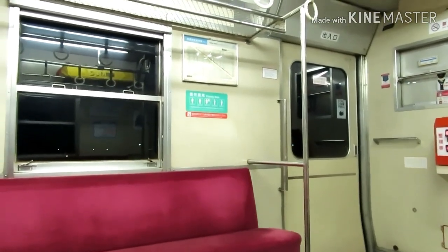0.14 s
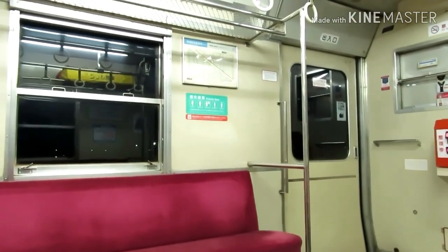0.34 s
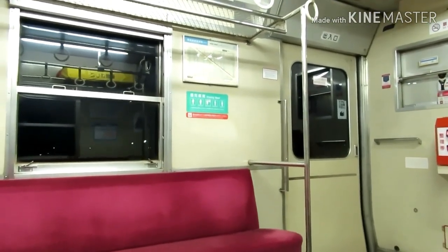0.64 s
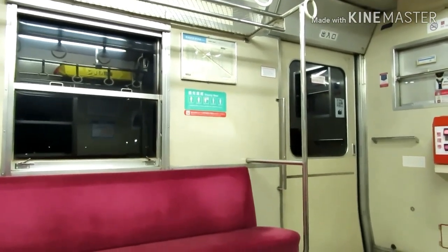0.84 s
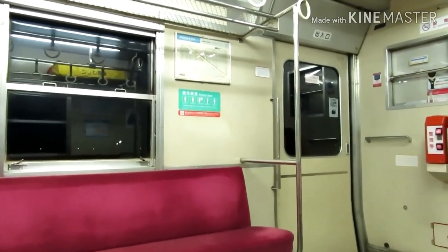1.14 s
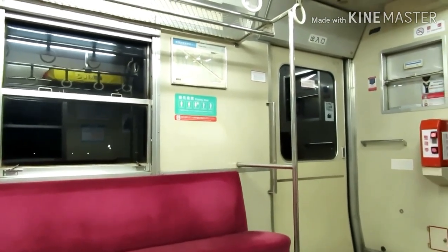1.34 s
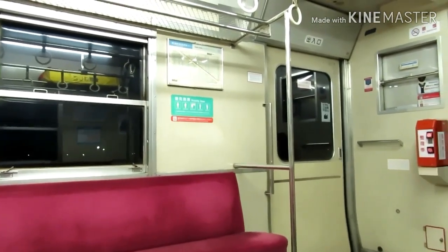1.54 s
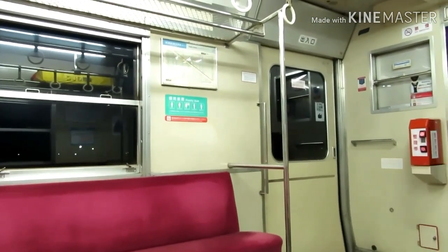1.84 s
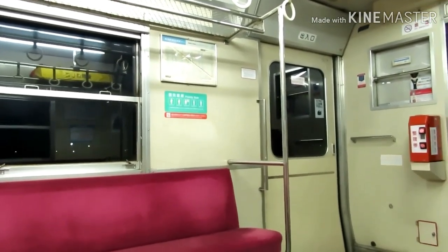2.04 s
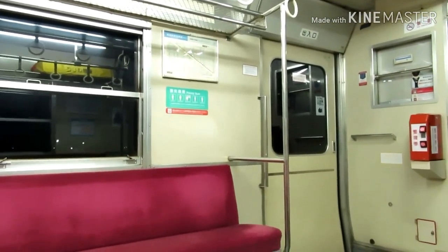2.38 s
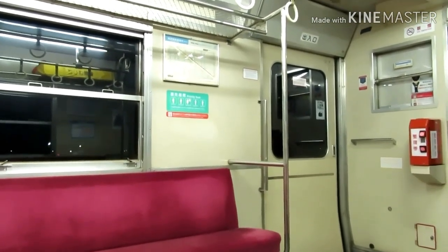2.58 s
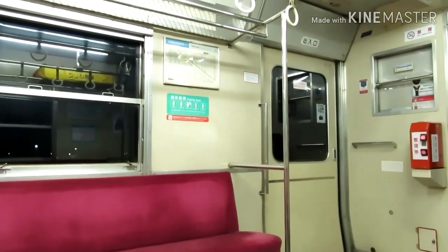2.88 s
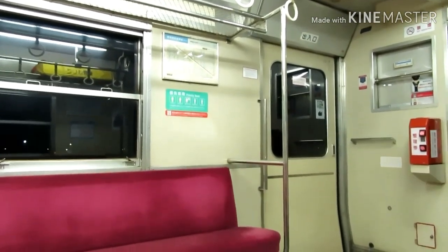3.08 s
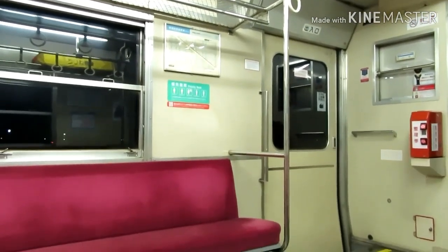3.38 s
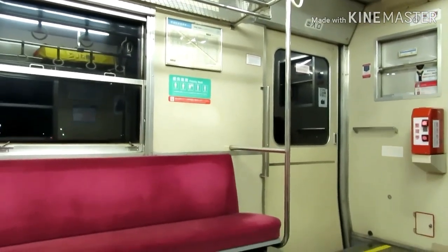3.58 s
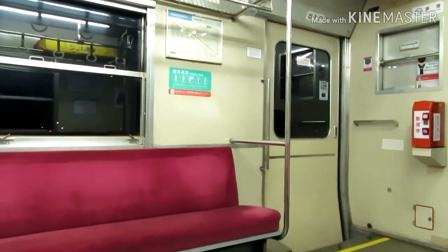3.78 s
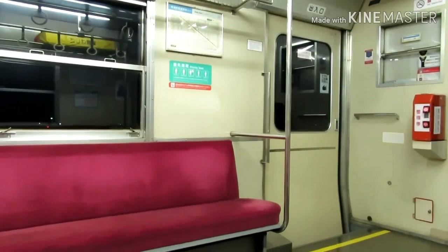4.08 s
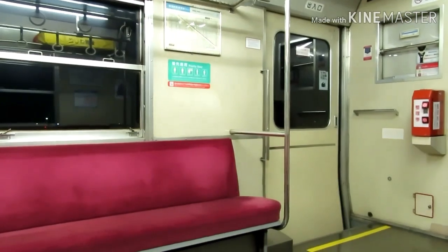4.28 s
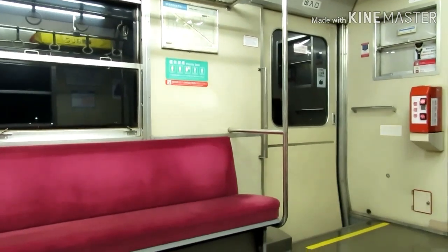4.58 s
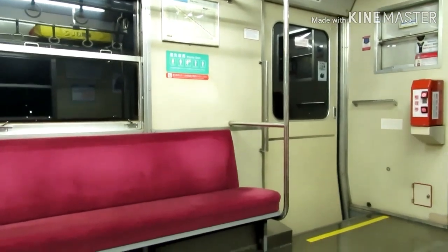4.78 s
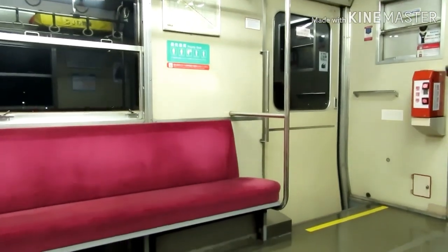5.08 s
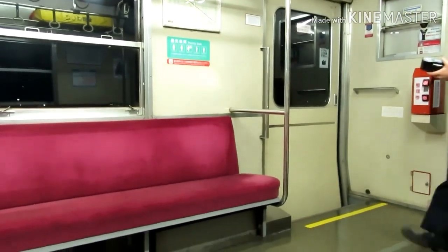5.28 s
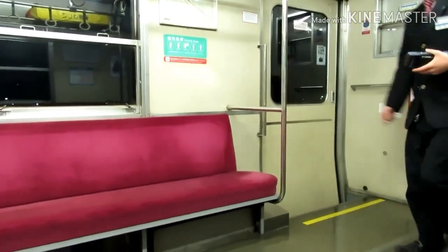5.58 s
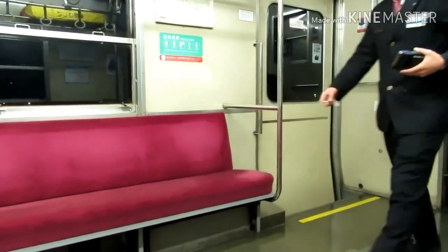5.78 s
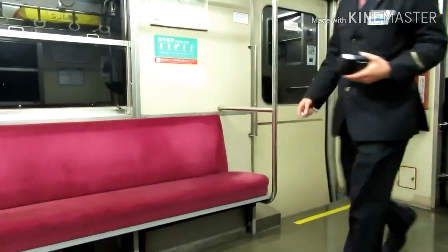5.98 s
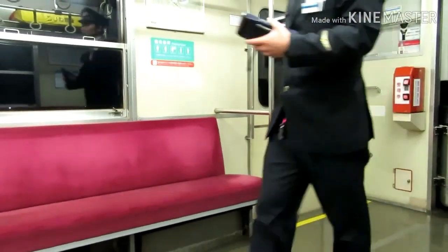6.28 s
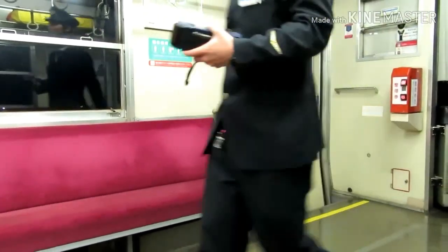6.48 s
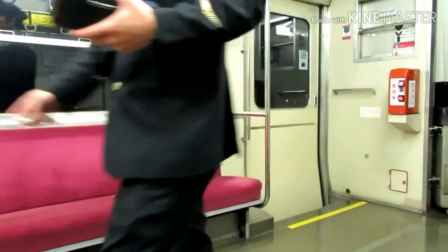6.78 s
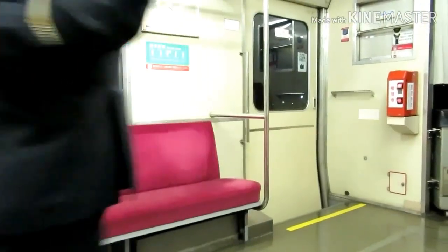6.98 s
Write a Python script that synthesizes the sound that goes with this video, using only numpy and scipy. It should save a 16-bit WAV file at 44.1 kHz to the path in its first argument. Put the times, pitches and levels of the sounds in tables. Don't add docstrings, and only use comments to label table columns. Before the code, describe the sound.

Inside a moving diesel railcar, a steady deep engine drone and slow swelling body boom lie under the broad roar of wheels on rails. Hard joint knocks come early, then heavy dull thuds near the middle with rubber squeaks and short groans. Later knocks are softer, with fittings ticking. A close stereo microphone hears shared bass and slightly wider treble.

```python
import sys
import numpy as np
from scipy import signal
from scipy.io import wavfile
from scipy.ndimage import uniform_filter1d, minimum_filter1d

SR = 44100
rng = np.random.default_rng(int(sys.argv[2]) if len(sys.argv) > 2 else 0)


def to_linear_factor(level_db):
    exponent = np.asarray(level_db, float) / 20
    return 10 ** exponent


def persist_wave(psi):
    counts = np.round(np.clip(psi, -1, 1) * 32767).astype(np.int16)
    wavfile.write(sys.argv[1], SR, np.atleast_2d(counts).T)


N = 314433

# time in seconds, cycles per second.
CRANK_SPEED = [(0, 13.98), (7.13, 14.07)]
# time in seconds, lift of the firing order in dB.
ENGINE_LOAD = [(0, -1.5), (.5, 4), (1.7, -0.5), (2.5, 3), (3.5, -3.5), (4.5, 2.5), (5.8, -.5), (6.5, 6),
               (7.13, 0)]
# order of the crank cycle, level in dB.
WEAK_ORDERS = [(3, -60), (4, -36.5), (11, -34.5), (13, -27), (14, -42), (20, -35.5), (28, -49), (30, -47.5)]
# pitch in Hz, width in Hz, level in dB.
BOOM_MODES = [(61.82, 1.76, 15), (57.2, 4.6, -15), (54.4, 2, -27), (119.5, 2.7, 1.5), (137, 1.8, -11),
              (222, 1.8, -12)]
# centre in seconds, lift in dB, length in seconds.
BODY_SWINGS = [(.4, 4.5, 0.56), (1.03, 8.5, 0.4), (1.65, 10.5, 0.23), (2.35, 9, 0.56), (2.85, -4, .45),
               (3.62, 5, 0.53), (4.2, 7.5, 0.98), (5.3, 6, 0.23), (6.4, 0.5, 1.0), (7.1, 7.5, 0.97)]
TRACK_HZ = [40, 250, 1200, 5000]
ROUGHNESS_SHARES = [.01, .6, 1.01, 1.15]
# time in seconds, level in dB.
RAIL_ROUGHNESS = [(0, -37), (.12, -35), (.4, -35), (.72, -33), (.9, -34.5), (1.12, -33.5), (1.62, -36.5),
                  (1.76, -40.5), (2.4, -35.5), (3.0, -37), (3.25, -40), (3.55, -36.5), (3.75, -38.5),
                  (4.2, -36.5), (5.1, -38), (5.38, -35.5), (5.9, -38), (6.6, -36)]
# centre in seconds, lift in dB, length in seconds.
TRACK_DIPS = [(.75, 6.5, 2.7), (1.1, -3.5, 0.55), (1.5, 2.5, 1.2), (2.9, 10.5, 0.67), (3.56, 7.5, 0.15),
              (4.1, -1, .4), (4.65, 6.5, .75), (5.25, 10, .7), (6.58, 9, 0.74), (7.1, 3.5, 0.65)]
# centre in seconds, lift in dB, length in seconds.
FLOOR_DRUMMING = [(1.4, 0, 0.13), (2.77, 1.5, 0.27), (3.25, 3.5, 1), (5.45, 4, 0.83), (6.0, 4.5, 0.94),
                  (6.9, 1.5, 1)]
# centre in seconds, lift in dB, length in seconds.
CHATTER = [(.52, 1.5, .4), (3.02, 0.5, .2), (5.0, 1.5, .25), (6.6, 3.5, 0.45)]
# frequency in Hz, level in dB per Hz.
SHARED_ROAR = [(9, -40), (22, -16), (32, 1), (70, -1.5), (110, -5), (171, -5.5), (215, -9), (279, -2.5),
               (457, -16), (685, -18), (915, -27.5), (1680, -30.5), (3180, -39), (6500, -54.5),
               (10500, -62), (13500, -67), (15300, -73)]
# frequency in Hz, level in dB per Hz.
APART_ROAR = [(24, -75), (40, -44), (86, -12), (165, -5), (264, -0.5), (480, -7), (631, -11.5), (2080, -14),
              (11500, -29), (13400, -29), (15200, -34)]
# pitch in Hz, width in Hz, lift in dB.
CABIN_MODES = [(308, 44, -1.5), (395, 29, -2), (696, 140, -3), (2450, 60, 1.5), (8300, 740, 3.5)]
# start in seconds, blow in dB, floor ring in Hz, brightness in dB.
RAIL_JOINTS = [
    (0.558, -18, 161.5, -18),
    (1.38, -7.5, 199.4, -17),
    (1.63, -9, 193, -17.5),
    (2.76, -13, 305, -22),
    (3.05, -6, 159, -30),
    (3.483, -6, 159.4, -33),
    (4.969, -13.5, 406, -22),
    (5.35, -15, 189, -19),
    (6.058, -22, 168, -17),
    (6.57, -25, 260, -7),
]
# frequency in Hz, time to fall 60 dB in seconds.
JOINT_T60 = [(100, 0.23), (600, 0.17), (4000, 0.35)]
# pitch in Hz, level in dB, time to fall 60 dB in seconds.
BOGIE_MODES = [(400, -4, 0.15), (694, -11, 0.16), (1200, -11.5, 0.12), (1750, -8.5, 0.038),
               (2067, -15.5, 0.13), (4000, -23.5, 0.1)]
# centre in seconds, pitch in Hz, level in dB, length in seconds.
FLOOR_PANELS = [(0.369, 117.2, -21, 0.22), (.55, 146.5, -23.5, 0.27), (1.928, 309.4, -26, .3),
                (2.271, 395, -31.5, .3), (2.81, 355, -27.5, 0.28), (3.173, 260, -25.5, 0.26),
                (3.2, 137, -20, .3), (3.299, 395, -29.5, .35), (5.12, 174.7, -27.5, 0.22),
                (5.399, 440, -31, .3), (5.688, 392, -27.5, 0.15), (5.6, 133.4, -20, .2),
                (6.121, 282.3, -23.5, 0.47), (6.892, 289.7, -26, 0.29), (7.081, 395, -28, 0.21),
                (7.07, 164.6, -30, .15)]
# start in seconds, length in seconds, level in dB, top pitch in Hz,
# depth of the cluster below it in Hz.
SQUEAKS = [
    (3.161, .5, -55, 10850, 1200),
    (5.45, .12, -55, 10250, 350),
    (5.818, .08, -60, 9950, 250),
    (6.961, 0.051, -49, 7330, 400),
    (7.038, .3, -58, 9700, 900),
]
# start in seconds, length in seconds, level in dB, pitch in Hz.
GROANS = [
    (3.087, 0.19, -33.5, 704),
    (3.273, 0.21, -35, 648),
    (3.45, 0.19, -30.5, 619),
]
# start in seconds, peak in dB, ring in Hz, time to fall 60 dB in seconds.
FITTING_TICKS = [(.67, -41, 8000, 0.025), (.77, -46, 8000, .03), (2.46, -51, 8500, .03),
                 (2.63, -49, 8000, .03), (3.613, -44, 8700, .025), (1.626, -47, 4000, 0.14),
                 (1.656, -41, 3000, 0.072), (4.895, -57, 11900, .15), (4.91, -57, 14500, .15),
                 (4.925, -54, 10500, .1), (4.935, -59, 13000, .1), (5.365, -45.5, 8000, .04),
                 (5.625, -52, 7800, .03), (6.01, -49, 9000, .03), (6.535, -47, 5300, .03),
                 (6.628, -40, 4530, 0.058), (6.629, -41, 11000, .015), (6.63, -49, 7500, .02),
                 (6.768, -45, 12400, .025), (7.037, -51, 13000, .025)]


def evened(x):
    return x / np.sqrt(np.mean(x ** 2) + 1e-20)


def read(points, hz):
    f, value = np.transpose(points)
    return np.interp(np.log(hz + 1), np.log(f + 1), value)


def curve(rows, t):
    s, value = np.transpose(rows)
    return np.interp(t, s, value)


def humps(rows, t):
    total = 0
    for s, db, length in rows:
        total = total + db * np.cos(np.pi * np.clip((t - s) / length, -.5, .5)) ** 2
    return total


def add(mix, s, sound):
    part = mix[..., round(s * SR):][..., :sound.shape[-1]]
    part += sound[..., :part.shape[-1]]


def resonate(x, hz, width):
    turn = np.exp(2j * np.pi * np.cumsum(hz * np.ones(x.shape[-1])) / SR)
    r = np.exp(-np.pi * abs(width) / SR)
    for _ in range(2):
        x = 2 * (turn * signal.lfilter([1 - r], [1, -r], x / turn + 1e-18)).real
    return x


def coloured(db, count):
    re, im = rng.standard_normal((2,) + db.shape[::-1])
    spectra = (re + 1j * im).T * to_linear_factor(db)
    return evened(signal.istft(spectra, nperseg=1024, noverlap=768)[1][:count])


def engine():
    t = np.arange(N) / SR
    load_db = curve(ENGINE_LOAD, t)
    firing_db = -23.5 + load_db
    double_db = -27 + 0.51 * load_db + 0.31 * t
    turn = 2 * np.pi * np.cumsum(curve(CRANK_SPEED, t)) / SR
    out = to_linear_factor(firing_db) * np.sin(6 * turn) + to_linear_factor(double_db) * np.sin(12 * turn + 1)
    for order, db in WEAK_ORDERS:
        waver = evened(uniform_filter1d(rng.standard_normal(N), size=9000))
        out += to_linear_factor(db + 1.03 * waver) * np.sin(round(order) * turn + 2 * np.pi * rng.random())
    return np.sqrt(2) * out


def body():
    shake = rng.standard_normal(N)
    modes = sum(to_linear_factor(db) * evened(resonate(shake, hz, width)) for hz, width, db in BOOM_MODES)
    held = np.sqrt(uniform_filter1d(modes ** 2, size=6000)) + 0.22
    return evened(modes / held) * to_linear_factor(-23 + humps(BODY_SWINGS, np.arange(N) / SR))


def drift(shape, frames, bins):
    smooth = uniform_filter1d(rng.standard_normal(shape), frames, 0)
    return evened(uniform_filter1d(smooth, bins, 1)).T


def track():
    t, hz = np.arange(N // 256 + 5) * 256 / SR, np.fft.rfftfreq(1024, 1 / SR)
    levels = np.outer(ROUGHNESS_SHARES, curve(RAIL_ROUGHNESS, t))
    levels[0] += humps(TRACK_DIPS, t)
    levels[1] += humps(FLOOR_DRUMMING, t)
    levels[3] += humps(CHATTER, t)
    share = np.array([read(list(zip(TRACK_HZ, one)), hz) for one in np.eye(4)])
    field = share.T @ (levels - levels.mean(1, keepdims=True))

    shape = (len(t), len(hz))
    patches = drift(shape, 10, 14)
    cabin_drift = drift(shape, 24, 2)
    rattle = evened(uniform_filter1d(rng.standard_normal(len(t)), size=4))
    field += (1.57 + 2.4 * hz / 15000)[:, None] * cabin_drift
    field += (0.33 + 3.6 * (hz / 15000) ** 2)[:, None] * patches
    field += np.outer(0.5 * hz / (hz + 1500), rattle)
    for pitch_hz, width_hz, db in CABIN_MODES:
        field += (db / (1 + ((hz - pitch_hz) / (width_hz / 2)) ** 2))[:, None]

    shared = to_linear_factor(-15.5) * coloured(field + read(SHARED_ROAR, hz)[:, None], N)
    apart = to_linear_factor(-44.5) * coloured(1.04 * field + read(APART_ROAR, hz)[:, None], N)
    return np.array([shared + apart, shared - apart])


def joints():
    out, u = np.zeros(N), np.arange(14000) / SR
    t, hz = np.arange(60) * 256 / SR, np.fft.rfftfreq(1024, 1 / SR)
    colour_db = 0.9 * read(SHARED_ROAR, hz) - 1.2 * hz / 1000
    burst_db = colour_db[:, None] - 60 * t / read(JOINT_T60, hz)[:, None]
    for s, db, ring_hz, bright_db in RAIL_JOINTS:
        burst = coloured(burst_db, len(u))
        ring = np.sin(2 * np.pi * ring_hz * u) * to_linear_factor(-60 * u / 0.3)
        clank = np.zeros(len(u))
        for mode_hz, mode_db, t60 in BOGIE_MODES:
            struck_hz = mode_hz * rng.uniform(0.94, 1.04)
            clank += to_linear_factor(mode_db - 60 * u / t60) * np.sin(2 * np.pi * struck_hz * u)
        onset = 1 - np.exp(-u / 0.0091)
        add(out, s, to_linear_factor(db) * onset * (1.23 * ring + to_linear_factor(bright_db) * (1.93 * burst + 6.7 * clank)))
    return out


def panels():
    out = np.zeros(N)
    for s, hz, db, length in FLOOR_PANELS:
        u = np.arange(0, length, 1 / SR)
        tone = np.sin(2 * np.pi * (hz * u + rng.random()))
        add(out, s - length / 2, to_linear_factor(db + 5.5) * np.hanning(len(u)) * tone)
    return out


def whistle(hz, db, width_hz):
    shared, apart = resonate(rng.standard_normal((2, len(db))), hz, width_hz)
    tone = np.array([shared + 0.33 * apart, shared - 0.43 * apart])
    return to_linear_factor(db + 2.5) * evened(tone)


def arched(length, db, hz, arch_hz, sag_hz, width_hz):
    u = np.minimum(np.arange(SR // 2) / SR / length, 1)
    arch = np.sin(np.pi * u)
    pitch_hz = hz + arch_hz * np.sin(np.pi * u ** .75) ** 2 - sag_hz * u
    ends_db = -9.5 * (1 - arch)
    return whistle(pitch_hz, db + ends_db, width_hz) * np.minimum(10 * arch, 1)


def groans():
    out = np.zeros(N)
    for s, length, db, hz in GROANS:
        add(out, s, arched(length, db, hz, arch_hz=0, sag_hz=25, width_hz=70).mean(0))
    return out


def squeak(length, db, top_hz, depth_hz):
    t = np.arange(SR) / SR
    worn = np.minimum(t / length, 1) ** 3
    hz = top_hz - 300 * worn
    depth = depth_hz * (1 - np.exp(-t / 0.077))
    out = np.zeros((2, len(t)))
    for place in np.linspace(0, 1, num=5):
        slips = evened(uniform_filter1d(rng.standard_normal(len(t)), size=700))
        tone = resonate(rng.standard_normal((2, len(t))), hz - place * depth, 170)
        out += to_linear_factor(3.7 * slips - 4.9 * place) * tone
    shape = np.minimum(t / 0.021, 1) * np.clip((length - t) / .01, 0, 1)
    return to_linear_factor(db + 6.5 - 10 * worn) * evened(out) * shape


def squeaks():
    out = np.zeros((2, N))
    for s, *row in SQUEAKS:
        add(out, s, squeak(*row))
    return out


def ticks():
    out, u = np.zeros((2, N)), np.arange(2500) / SR
    for s, db, hz, t60 in FITTING_TICKS:
        snap = rng.standard_normal((2, len(u))) * to_linear_factor(-60 * u / max(t60, .005))
        click = .25 * np.diff(snap, prepend=0)
        add(out, s, to_linear_factor(db) * (click + 7.2 * resonate(snap, hz, 1500)))
    return out


def gear():
    eased = np.clip((np.arange(N) / SR - 1.3) / .4, 0, 1)
    return whistle(5472, -64.5 - 7.5 * eased, 30)


def blower():
    out = np.zeros((2, N))
    add(out, .92, arched(.4, -71, 13100, arch_hz=1100, sag_hz=50, width_hz=160))
    return out


def scene():
    steady = engine() + body() + track()
    events = joints() + panels() + groans() + squeaks() + ticks()
    return steady + events + gear() + blower()


def masked(x):
    hz, t, z = signal.stft(x, SR, nperseg=1024)
    power = uniform_filter1d(uniform_filter1d(abs(z) ** 2, size=8, axis=1), size=3, axis=2)
    power_db = 10 * np.log10(power + 1e-20)
    below_db = np.roll(-minimum_filter1d(-power_db, size=30, axis=1), 15, axis=1)
    dropped = (power_db < below_db - 10.5) & (hz > 9500)[:, None]
    usual_db = np.median(power_db[0], axis=1, keepdims=True)
    faint = power_db[0] < usual_db - 1.5 * (15500 - hz[:, None]) / 1500
    dropped[0] |= faint & (hz > 11000)[:, None]
    return signal.istft(z * ~dropped, SR, nperseg=1024)[1][:, :N]


def low_pass(x):
    return signal.sosfilt(signal.butter(12, 15330, fs=SR, output="sos"), x)


def record(dry):
    cut = signal.sosfilt(signal.butter(2, 24, "high", fs=SR, output="sos"), dry)
    left, right = 1.162 * np.tanh(cut / 1.292)
    mid, side = masked(np.array([left + right, left - right]) / 2)
    return low_pass(np.array([mid + side, mid - side]))


dry = scene()
out = record(dry)
persist_wave(out)
```